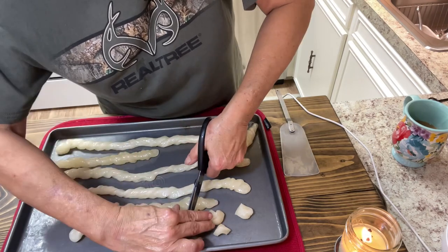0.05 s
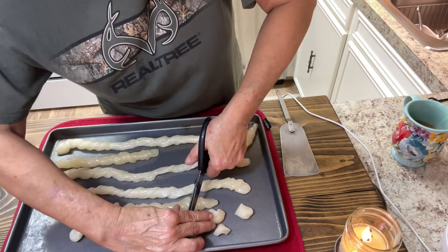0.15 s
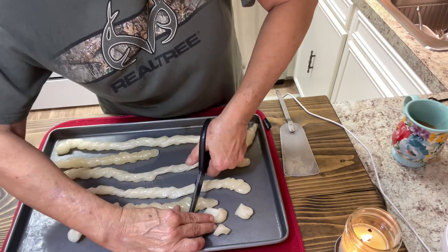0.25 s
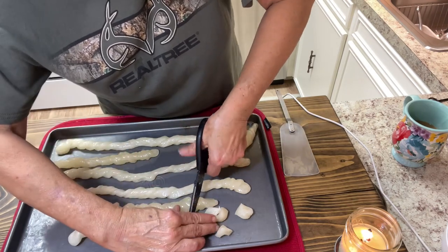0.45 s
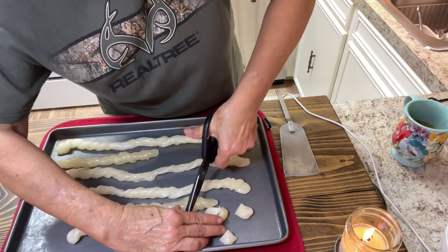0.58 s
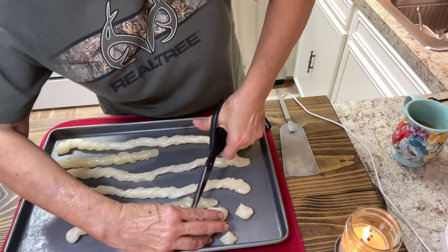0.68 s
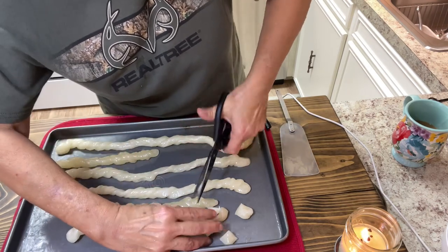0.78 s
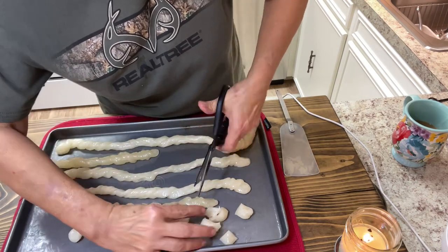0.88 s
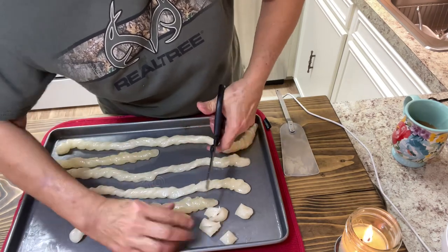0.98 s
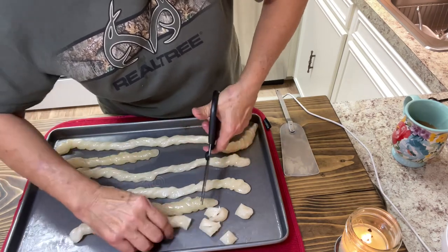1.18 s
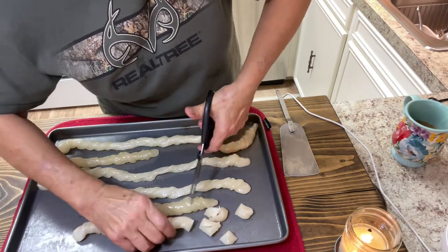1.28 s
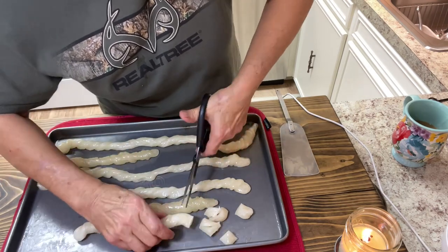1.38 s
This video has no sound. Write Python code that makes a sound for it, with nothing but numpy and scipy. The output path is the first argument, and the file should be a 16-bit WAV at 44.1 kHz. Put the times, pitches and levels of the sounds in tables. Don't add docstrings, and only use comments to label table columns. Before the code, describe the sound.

One sharp crack of hard candy cut by scissors, then pieces ticking across a thin metal pan

```python
import sys
import numpy as np
from scipy import signal
from scipy.fft import rfft, irfft
from scipy.io import wavfile
from scipy.ndimage import uniform_filter1d

SR = 44100
rng = np.random.default_rng(int(sys.argv[2]) if len(sys.argv) > 2 else 0)


def master(y):
    cut = np.clip(np.atleast_2d(y).T, -1, 1)
    pcm = np.round(cut * 32767)
    wavfile.write(sys.argv[1], SR, pcm.astype(np.int16))


def invert_db(level):
    return 10 ** (np.asarray(level, dtype=float) / 20)


N = 63945
SPAN = 2048


def unit(x):
    return x / np.sqrt(np.mean(x ** 2))


def band(x, hz, q):
    return signal.lfilter(*signal.iirpeak(min(hz, 0.4 * SR), q, fs=SR), x)


def along(table, hz):
    point_hz, value = np.array(table).T
    return np.interp(np.log(hz), np.log(point_hz), value)


def walk(rate):
    hold = int(SR / rate)
    steps = np.repeat(rng.standard_normal(N // hold + 1), hold)
    return unit(uniform_filter1d(steps, hold)[:N])


def bands():
    for hz in 40 * 2 ** (np.arange(26) / 3):
        yield hz, band(band(rng.standard_normal(N), hz, 3), hz, 3)


def add(out, s, piece):
    i = int(s * SR)
    out[..., i:i + SPAN] += piece[..., :N - i]


def modes(push, table):
    t = np.arange(SR // 4) / SR
    ring = sum(invert_db(db - 60 * t / t60) * np.sin(2 * np.pi * hz * t) for hz, db, t60 in table)
    return signal.fftconvolve(push, ring)[:N]


def burst(colour, rise_s, fall_s):
    t = np.arange(SPAN) / SR
    spray = colour(rng.standard_normal(SPAN) * (1 - np.exp(-t / rise_s)) * np.exp(-t / fall_s))
    fade_out = np.clip(4 - 4 * np.arange(SPAN) / SPAN, 0, 1) ** 2
    spray = spray * fade_out / np.abs(spray).max()
    click = colour(1.0 * (np.arange(SPAN) == 100))
    return np.array([spray, unit(click) * np.sqrt(np.mean(spray ** 2))])


def contacts(table, rise_s, fall_s):
    # pitch in Hz, level in dB.
    sugar = [(300, -29.5), (900, -6.5), (2000, -0.5), (4500, 1.8), (8000, -6), (16000, -15.5)]
    # pitch in Hz, level in dB, time to fall 60 dB in s.
    tray_high = [(926, -5.5, 0.015), (1138, 2, 0.13), (1143.5, -5.5, 0.015), (1320, -22.5, 0.02),
                 (1385, -10, 0.071), (1400, -10, 0.045), (2080, -7.5, 0.1), (2420, 9.5, 0.033),
                 (2740, -9, 0.17), (2780, 2, .07), (2990, 2, 0.054), (4400, -6, 0.05), (5375, 8.5, .06),
                 (5340, 2.5, 0.07)]
    knock_t60_s, knock_send_db, ring_db = 0.015, 2.5, -27
    out = np.zeros((2, N))
    t = np.arange(SPAN) / SR
    hz = np.arange(1, SPAN // 2 + 2) * SR / SPAN
    for s, crack_db, tilt_db, knock_db, knock_hz in table:
        gain = invert_db(along(sugar, hz) + tilt_db * np.log2(hz / 4000))
        crack = invert_db(crack_db) * burst(lambda v: irfft(rfft(v) * gain), rise_s, fall_s)
        knock = np.sin(2 * np.pi * knock_hz * t) * (1 - np.exp(-t / 0.00048)) ** 2
        fade_db = 60 * t / knock_t60_s * np.sqrt(knock_hz / 1200)
        knock = knock * invert_db(knock_db + 4 + np.array([-fade_db, knock_send_db - 2 * fade_db]))
        add(out, s, crack + knock)
    out[0] += invert_db(ring_db) * modes(out[1], tray_high) / 20
    return out


def fridge_and_air():
    # pitch in Hz, level in dB per Hz.
    air_colour = [(40, -8.5), (70, 6), (110, -5), (180, -3), (400, -1), (800, -15.5), (2200, -32),
                  (15000, -47)]
    # pitch in Hz, level in dB.
    hum_tones = [(59.2, -60.5), (78, -70), (172.3, -63), (199.2, -73.5), (344.5, -67)]
    t = np.arange(N) / SR
    air = sum(invert_db(along(air_colour, hz) + 2.0 * walk(27)) * v for hz, v in bands())
    out = unit(air) * invert_db(-55.5)
    for hz, db in hum_tones:
        flicker_db = hz / 150 * walk(30)
        out = out + np.sqrt(2) * invert_db(db + flicker_db) * np.sin(2 * np.pi * hz * t)
    return out


def blade_ticks():
    # start in seconds, level in dB, centre pitch in Hz, sharpness Q (no unit).
    tick_rows = [(.775, -54, 13950, 1.5), (0.778, -53, 11600, 6), (0.782, -48, 15300, 5),
                 (0.784, -49.5, 8000, 10), (.790, -54.5, 13800, 6), (.787, -55, 10500, 1.8),
                 (.796, -47, 13300, 8.2), (0.802, -56, 12560, 7.1), (0.805, -56.5, 8200, 4),
                 (.808, -54, 11000, 7.4), (.813, -51, 9300, 8), (0.8719, -52, 14780, 2.7),
                 (0.8797, -47.5, 13960, 2.7), (.9635, -53, 12000, 1.8), (0.999, -62, 11770, 2.4),
                 (1, -61, 11000, 1.75), (1.030, -65.5, 11700, 1.5), (1.04, -49, 4500, 1.2),
                 (1.0402, -50, 9800, 1.5), (1.053, -66, 8500, 3), (0.054, -60, 10000, 0.76),
                 (.056, -60, 2680, 12), (.080, -67, 2700, 20), (.105, -65, 2560, 20)]
    out = np.zeros((2, N))
    for s, db, hz, q in tick_rows:
        fall_s = (7.8 + 3 * q) / hz
        add(out, s, invert_db(db) * burst(lambda v: band(band(v, hz, q), hz, q), 0.00038, fall_s))
    return out


def landings():
    # start in seconds, crack level in dB,
    # brightness in dB per octave, knock level in dB, knock pitch in Hz.
    crumb_rows = [(0.057, -70, -3.5, -54.5, 2640), (.0620, -86, -2.5, -46.5, 1310),
                  (.1132, -88.5, -9, -42.5, 1320), (.146, -86, -5, -58, 1100), (.1355, -79.5, 0, -53, 1380),
                  (.6135, -35.5, -5.5, -38, 1260), (.6465, -41, -7, -42, 1234),
                  (.6635, -33, -11, -32, 1324), (1.1622, -41.5, -5.5, -40.5, 1880),
                  (1.212, -43.5, -8.5, -48.5, 1301), (1.265, -51.5, -14, -47, 1130),
                  (.514, -90, 2, -30, 530), (.682, -67, -3.5, -31, 490), (0.91, -75, 2.5, -43, 530),
                  (.905, -81, .1, -28, 787), (1.096, -83, -0.3, -37, 562), (1.0995, -81, 0, -33, 270),
                  (.9095, -80, 2, -35, 257), (1.107, -80, 2, -39, 78)]
    # start in seconds, crack level in dB,
    # brightness in dB per octave, knock level in dB, knock pitch in Hz.
    bounce_rows = [(.2787, -11, -1, -26, 1190), (.2790, -30, -4.3, -16, 4170),
                   (.2932, -17, -6.5, -13, 2520), (.2945, -16, -7, -15, 2500), (.2958, -18, -7, -19, 1310),
                   (.4602, -33.5, -8.5, -27, 1250), (.4757, -32, -1, -34, 2120), (.4765, -60, 0, -46, 5200),
                   (.497, -60, -5, -39, 1612), (.5112, -21.5, -1.3, -21, 1127),
                   (.5116, -38.5, -2, -22.5, 4250), (.5125, -24, 9, -22, 7200), (.5165, -29, -4, -37, 5400),
                   (.6787, -17, -1, -22, 1080), (.6790, -60, 0, -27, 1400), (.6792, -26.5, -1, -23.5, 2620),
                   (.6808, -22, 0, -24, 5410), (.6825, -35, -2, -28, 2470), (.7003, -25, -4, -28, 1410),
                   (.7022, -29.5, -3, -34, 2480), (.8932, -41, -3, -48, 1300),
                   (.9033, -23, -3.5, -24.5, 1376), (.9036, -42, -8, -28, 1070),
                   (.9068, -31, -6.5, -43, 1330), (1.0935, -34.5, -0.45, -36.5, 1120),
                   (1.094, -37, -3, -30, 5630), (1.0955, -51, -4, -38, 4230), (1.0975, -40, 2, -35, 5800),
                   (1.0945, -59, -2, -35.5, 7530)]
    rise_s, fall_s = 0.00019, 0.0023
    return contacts(crumb_rows, rise_s, fall_s) + contacts(bounce_rows, rise_s, fall_s)


def candy_snaps():
    # start in seconds, crack level in dB, brightness in dB per octave,
    # knock level in dB, knock pitch in Hz.
    snap_rows = [
        (.1862, -28, -1.6, -31, 1295),
        (.2072, -32.5, 2.5, -41.5, 1240),
        (.2228, -9, 1.5, -13.5, 1130),
        (.2258, 2.5, 1.3, -7, 1320),
        (.2285, -5, 4.5, -5, 2640),
        (.2358, -6.5, 1, -5.5, 1195),
        (.2395, -12, 0.5, -22, 1030),
    ]
    return contacts(snap_rows, rise_s=0.00098, fall_s=0.0024)


def tray_thumps():
    # start in seconds, level in dB, length of the push in ms.
    thump_rows = [
        (.2290, -13.5, 1.42),
        (0.2335, -5, 1.98),
        (.294, -28, 0.5),
        (0.463, -36, 0.77),
        (0.488, -39.5, 1.06),
        (0.514, -35, 0.22),
        (0.683, -35, 1.3),
        (0.907, -33.5, 0.7),
        (1.097, -41, 0.62),
        (1.107, -41.5, 3.7),
    ]
    # pitch in Hz, level in dB, time to fall 60 dB in s.
    tray_low = [(82.6, -21, 0.2), (190, -16.5, .09), (222, -3.5, 0.025), (250, 0, 0.09), (335.6, 0.5, 0.12),
                (430, -8.5, 0.052), (530, 3, 0.027), (656, -3, 0.045), (826, -12, .05)]
    push = np.zeros(N)
    t = np.arange(SPAN) / SR
    for s, db, ms in thump_rows:
        shape = np.sin(np.pi * np.clip(t * 1e3 / ms, 0, 1)) ** 2
        add(push, s, -invert_db(db) * shape / shape.sum() / 2)
    no_deep_bass = signal.butter(2, 145, "high", fs=SR, output="sos")
    return signal.sosfilt(no_deep_bass, modes(push, tray_low))


def sliding_piece():
    # time in seconds, level in dB, brightness in dB per octave.
    slide_path = [(1.157, -60, 2), (1.162, -53, -4), (1.222, -51, 1), (1.232, -60, -2.5), (1.29, -62, -6),
                  (1.3, -58.5, -8.5), (1.375, -62.5, -8), (1.39, -63, -5), (1.41, -58, -9), (1.42, -65, -7),
                  (1.45, -70, -10.5)]
    # pitch in Hz, width in Hz, level in dB.
    slide_body = [(1100, 330, -9), (2010, 135, 4.5), (3900, 500, -1.5), (4770, 130, -3), (5870, 1200, -8),
                  (2830, 130, -10), (3200, 350, -2), (4170, 2340, 3), (1474, 360, -5), (2630, 840, -3)]
    s, db, bright_db = np.array(slide_path).T
    t = np.arange(N) / SR
    grain_db = 1.35 * walk(89.14)
    soften = signal.butter(4, 7200, fs=SR, output="sos")
    rub = signal.sosfilt(soften, rng.standard_normal(N))
    rub = rub * invert_db(grain_db + np.interp(t, s, db, left=-140))
    tilt_db = np.interp(t, s, bright_db)
    out = np.zeros(N)
    for hz, width_hz, level_db in slide_body:
        gain = invert_db(level_db + tilt_db * np.log2(hz / 2000) + 1.8 * walk(45))
        ringing = band(band(rub, hz, hz / width_hz), hz, hz / width_hz / 2)
        out += gain * np.sqrt(SR / width_hz / 10) * ringing
    return out


def kitchen(x):
    # pitch in Hz, level in dB.
    room_db = [(70, -34), (170, -28.5), (300, -14.5), (700, -17.5), (1500, -18), (4000, -24), (9000, -18.5),
               (15000, -29)]
    # pitch in Hz, time to fall 60 dB in s.
    room_t60 = [(100, 0.94), (260, 0.4), (700, 0.34), (1840, 0.61), (4850, 0.61), (12800, 0.37)]
    t = np.arange(N) / SR
    tail = sum(invert_db(along(room_db, hz) - 60 * t / along(room_t60, hz)) * v for hz, v in bands())
    tail = tail * (1 - np.exp(-t / 0.0089))
    early = invert_db(-16) * band(rng.standard_normal(N), 3300, 0.2) * np.exp(-t / 0.023)
    return signal.fftconvolve(x, (tail + early) / 10)[:N]


def scene():
    thump_gain = invert_db(np.array([[0], [-3]]))
    near, send = (blade_ticks() + landings() + candy_snaps()
                  + tray_thumps() * thump_gain + sliding_piece())
    return (near + kitchen(send) + fridge_and_air())[None]


def band_limit(x):
    return signal.sosfilt(signal.butter(12, 17150, fs=SR, output="sos"), x)


def record(dry):
    rounded = np.tanh(0.97 * dry) / 0.94
    low = signal.butter(3, 59.4, "high", fs=SR, output="sos")
    top = signal.ellip(8, 0.3, 25, 15800, fs=SR, output="sos")
    mix = signal.sosfilt(np.vstack([low, top]), rounded)
    return band_limit(mix)


dry = scene()
out = record(dry)
master(out)
```